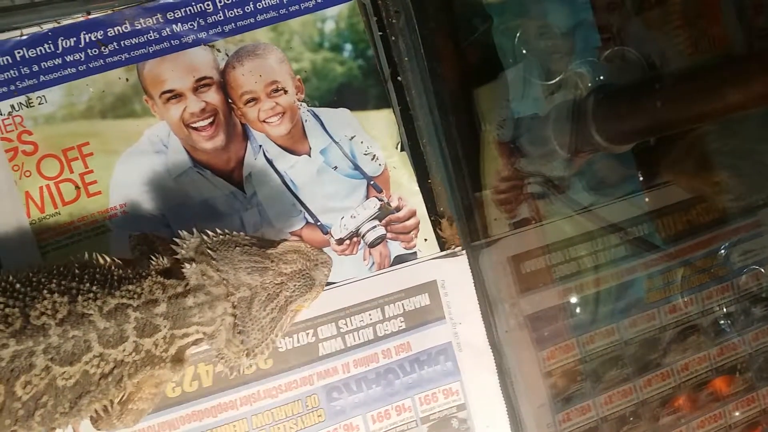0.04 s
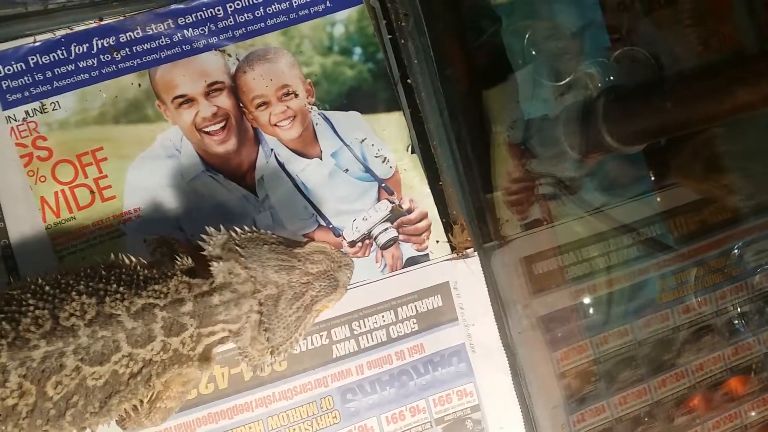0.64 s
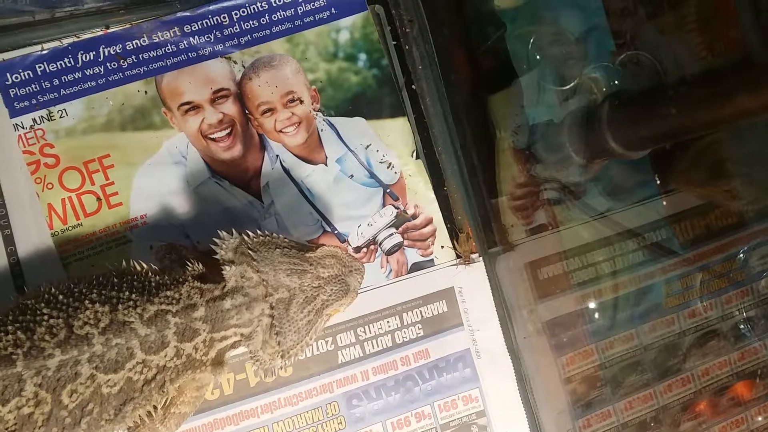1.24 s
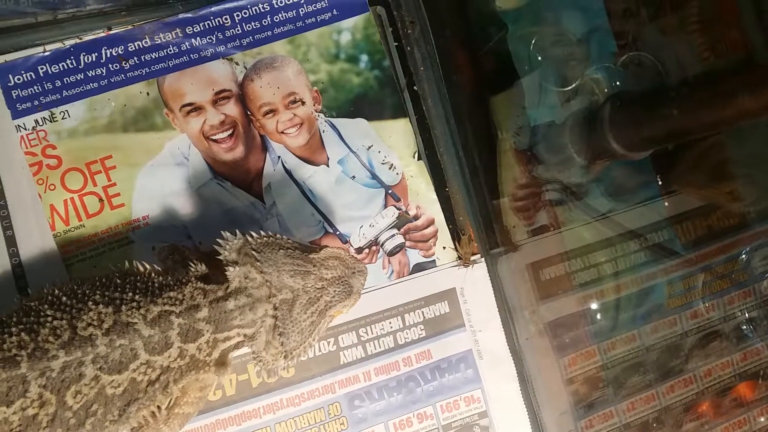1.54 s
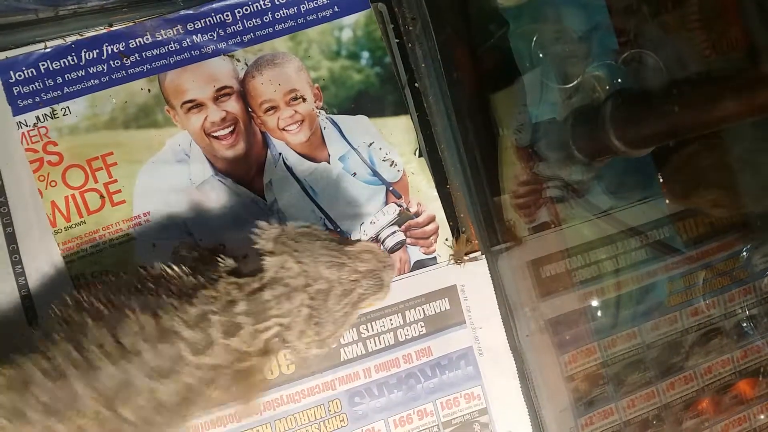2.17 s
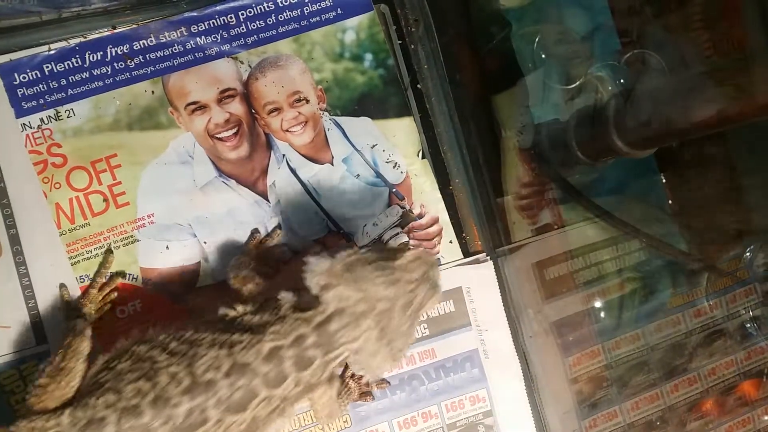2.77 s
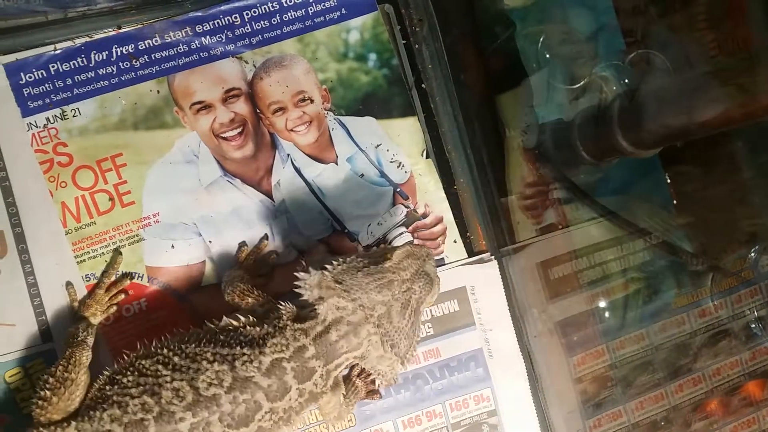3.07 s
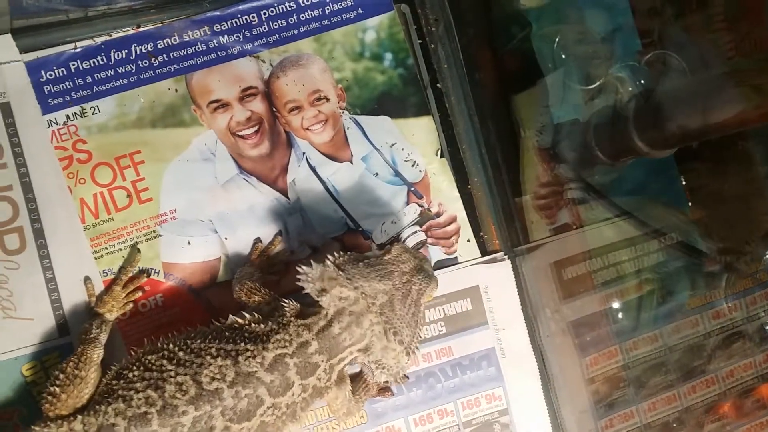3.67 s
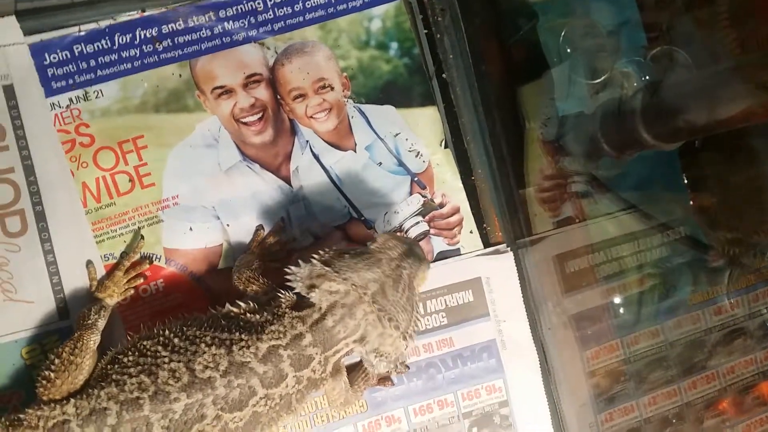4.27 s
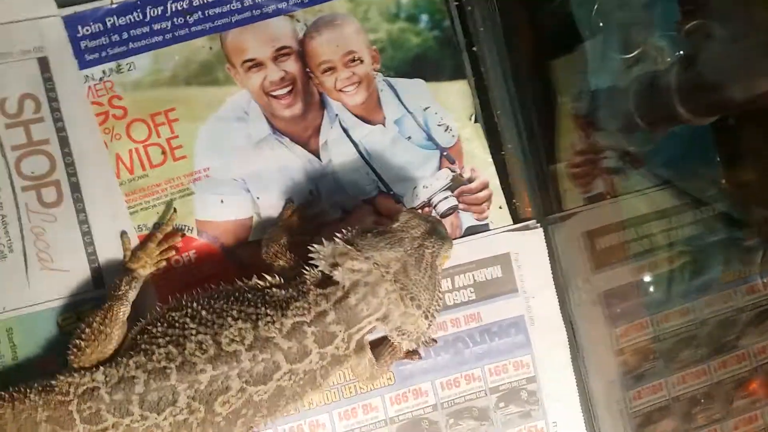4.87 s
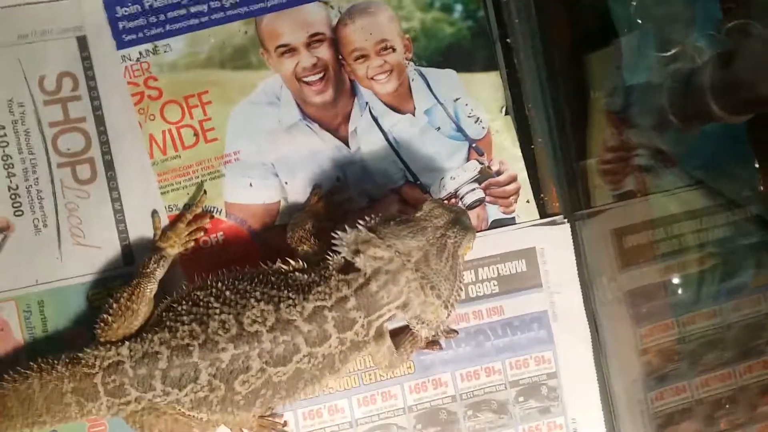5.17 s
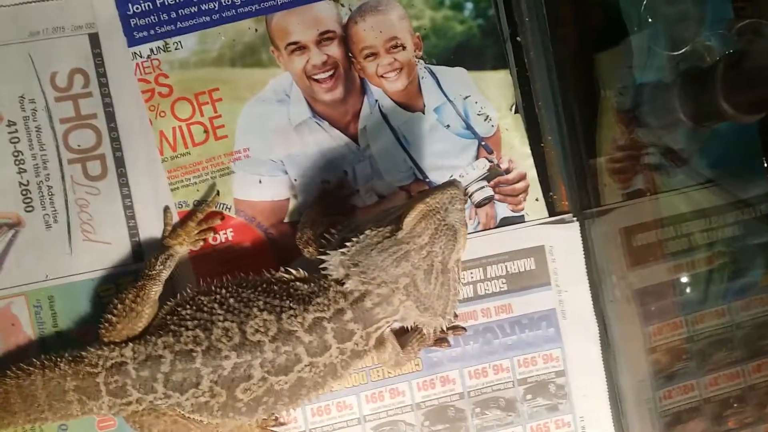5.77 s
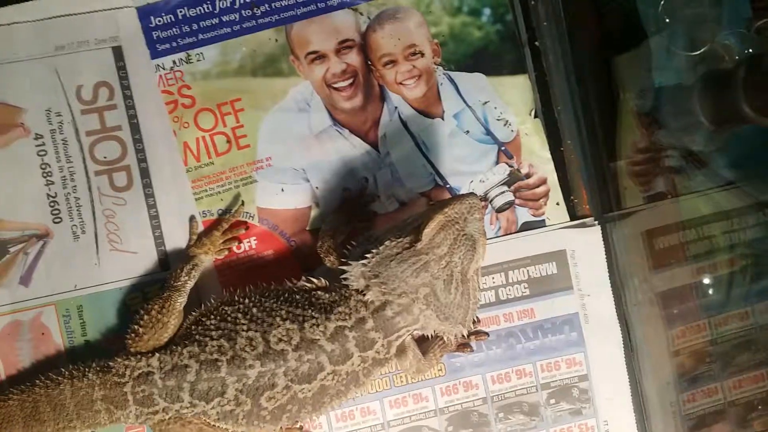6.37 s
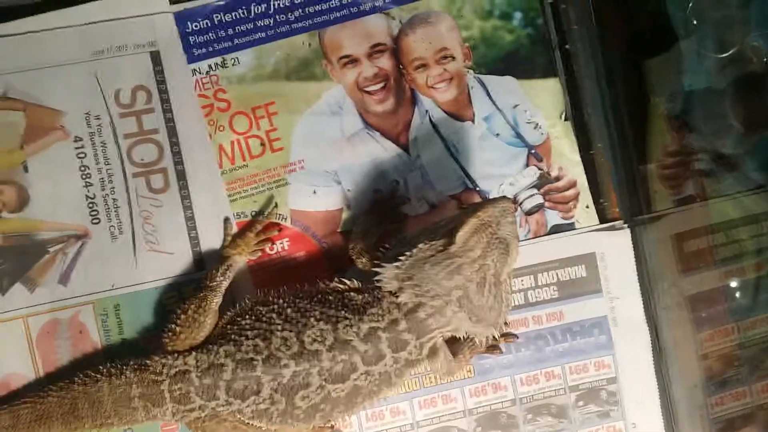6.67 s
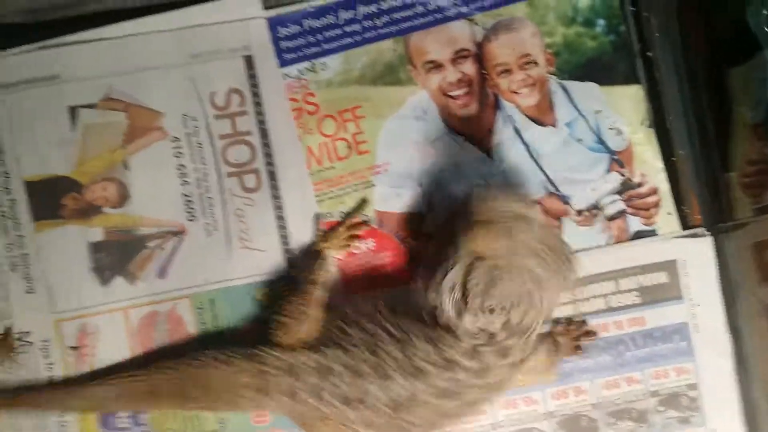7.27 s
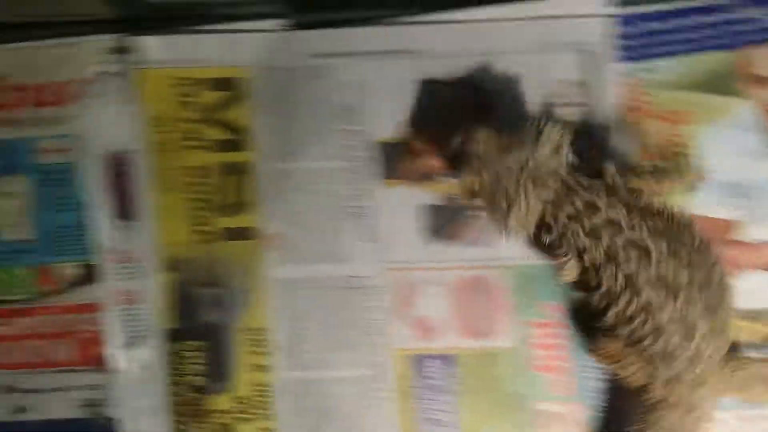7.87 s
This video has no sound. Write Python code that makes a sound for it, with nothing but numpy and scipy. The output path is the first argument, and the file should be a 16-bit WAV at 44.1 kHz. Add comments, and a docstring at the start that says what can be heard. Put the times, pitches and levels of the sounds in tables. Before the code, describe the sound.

A lizard stirs faintly on newspaper inside a glass tank, then lunges with a quick burst of rustling, claw scratches and soft thumps. It settles, leaving a few tiny paper ticks. Then it creeps forward with crinkling steps and breaks into a louder scramble. The microphones are close, with a faint electrical hum and hiss underneath.

```python
"""A glass tank lined with newspaper, a pair of microphones close to the lizard inside.
It stirs, lunges, settles, creeps and scrambles round. Its scales rasp on the sheets, its claws
tap and scratch, creases snap, and its weight drums the tank floor. The glass walls add short
echoes; a mains hum, quiet room noise and the microphones' faint hiss lie underneath."""
import sys
import numpy as np
from scipy import signal
from scipy.fft import rfft, irfft, next_fast_len
from scipy.io import wavfile
from scipy.ndimage import uniform_filter1d, map_coordinates

SR = 44100
rng = np.random.default_rng(int(sys.argv[2]) if len(sys.argv) > 2 else 0)


def file_out(sig):
    """Save sig as 16-bit WAV at sys.argv[1]."""
    # one column per channel
    cols = np.atleast_2d(sig).T
    # limit, then scale
    lim = np.clip(cols, -1, 1)
    pcm = np.round(lim * 32767).astype(np.int16)
    wavfile.write(sys.argv[1], SR, pcm)


N = 349713

# A limb or the belly pushed over the paper. Each row: start in seconds, length in seconds,
# relative level in dB, light over heavy contact in dB, swell from start to end in dB.
STROKES = [(0.548, 0.045, -73, 7, 0), (0.91, 0.046, -66.5, 1, -9), (1.166, 0.044, -60.5, 11, -2),
           (1.828, 0.082, -66.5, -4, 8), (2.102, 0.038, -56, 7.5, -8), (2.164, 0.13, -60, 11, 8),
           (2.268, 0.034, -40, 6.5, 14.5), (2.312, 0.058, -45, 8, -11), (2.382, 0.071, -38, -0.5, 1),
           (2.468, .058, -31.5, -2.5, 9.5), (2.531, 0.061, -42, -3, 4.5), (2.6, 0.29, -50.5, 2.5, 0.5),
           (2.667, 0.076, -45.5, 9, -11), (2.918, 0.58, -65, 9.5, -5), (3.806, 0.072, -74.5, 10, 17),
           (4.379, 0.2, -67.5, 1, -11), (5.028, 0.22, -65.5, -4, 2.5), (5.258, 0.35, -70, 0, -2),
           (5.569, 0.2, -59, -4, 2), (5.774, 0.18, -68, -7, 3), (5.925, 0.58, -60, -8, 0),
           (6.384, 0.14, -53.5, -2, 1.5), (6.532, 0.14, -49.5, -4, -4), (6.7, 0.15, -50, 1.5, -1),
           (6.847, 0.12, -44, -2.5, -18.5), (6.95, 0.26, -62.5, -8, 0), (7.153, 0.095, -51, 1, 1),
           (7.26, 0.087, -64, 2, 12), (7.331, 0.054, -47, 8, 11), (7.384, 0.067, -46, 17, 7.5),
           (7.456, 0.044, -34, 1, -8.5), (7.5, 0.098, -31.5, 16.5, -2.5), (7.613, 0.061, -30.5, 12, 4.5),
           (7.68, 0.11, -46.5, 1.5, 9.5), (7.772, 0.18, -38.5, 6, 7), (7.805, 0.018, -34.5, 8, 5)]


def amp(db):
    """Decibels to gain."""
    return 10 ** (np.asarray(db) / 20)


def unit(x):
    """Scale to rms 1."""
    return x / np.sqrt(np.mean(x ** 2) + 1e-20)


def along(points, hz):
    """Read between (Hz, value) points on a log frequency axis."""
    freqs, values = np.transpose(points)
    return np.interp(np.log(hz + 1), np.log(freqs + 1), values)


def wobble(rate, count=N):
    """A smooth random curve, rate knots a second."""
    return map_coordinates(rng.standard_normal(int(count * rate / SR) + 4), [np.arange(count) * rate / SR])


def burst(t, attack, t60):
    """A quick rise and an exponential fall of 60 dB in t60 seconds."""
    return (1 - np.exp(-t / attack)) * 10 ** (-3 * t / t60)


def noise():
    """White noise at each of the two microphones."""
    return rng.standard_normal((2, N))


def filtered(x, response):
    """Pass x through a frequency response."""
    count = x.shape[-1]
    size = next_fast_len(count + count // 10)
    return irfft(rfft(x, size) * response(np.fft.rfftfreq(size, 1 / SR)), size)[..., :count]


def ringing(modes, f):
    """Response of the direct sound plus resonances."""
    return 1 + sum(amp(db) * 1j * f * width / (hz * hz - f * f + 1j * f * width) for hz, width, db in modes)


def coloured(x, spectrum, modes=()):
    """Shape x with a broad spectrum and resonances, at rms 1."""
    return unit(filtered(x, lambda f: amp(along(spectrum, f)) * ringing(modes, f)))


def at_microphones(pair):
    """Long waves reach both microphones alike; each microphone's port has its own colour."""
    likeness = [(150, 0.91), (380, 0.77), (650, 0.44), (1000, 0), (16000, 0)]  # Each row: frequency in Hz, left-right correlation.
    balance = [(60, -2.5), (150, -2.5), (300, -2), (1100, -6.5), (2000, -1), (4200, -1), (6600, 4.5),
               (8400, -11), (10000, -4.5), (14000, -2)]  # Each row: frequency in Hz, left over right in dB.
    blend = lambda f: np.arcsin(np.clip(along(likeness, f), -1, 1)) / 2
    own = filtered(pair, lambda f: np.cos(blend(f)))
    crossed = filtered(pair[::-1], lambda f: np.sin(blend(f)))
    sides = lambda f: amp(np.outer([.5, -.5], along(balance, f)))
    return filtered(own + crossed, lambda f: sides(f) / np.sqrt(np.mean(sides(f) ** 2, axis=0)))


def microphone_hiss():
    """Each microphone's own noise."""
    # Each row: frequency in Hz, relative level in dB.
    left_colour = [(500, 3), (2200, -10.5), (4000, 3), (6500, 5), (8200, -3), (11000, -9.5), (16000, -3)]
    right_colour = [(500, 10), (2200, 0.5), (3600, -2), (6000, -4), (8400, -20), (10500, -15), (16000, 5)]
    left, right = noise()
    return np.array([amp(-68) * coloured(left, left_colour), amp(-73) * coloured(right, right_colour)])


def room_tone():
    """The mains and a small motor hum, wavering slightly, in quiet room noise."""
    # Each row: frequency in Hz, relative level in dB.
    hum_tones = [(59.2, -81.5), (118.6, -72), (121.2, -88), (242, -97.5)]
    room_colour = [(25, -34), (38, -23), (52, -12), (80, -3.5), (125, 4), (190, -6.5), (245, 2.5),
                   (320, -14.5), (440, -6), (700, -14.5), (1500, -16), (3000, -26.5), (8000, -41)]
    t = np.arange(N) / SR
    hum = np.zeros(N)
    for hz, db in hum_tones:
        level = np.sqrt(2) * amp(db + 4.1 * wobble(6.6))
        hum += level * np.sin(2 * np.pi * hz * t + 1.85 * wobble(1.8))
    return hum * amp([[-.8], [.8]]) + amp(-73.5) * at_microphones(coloured(noise(), room_colour))


def glass_echoes(x, t60, attack):
    """Dense echoes between the panes, different at each microphone."""
    t = np.arange(SR // 4) / SR
    tail = rng.standard_normal((2, len(t))) * burst(t, attack, t60)
    tail /= np.linalg.norm(tail, axis=1, keepdims=True)
    return signal.fftconvolve(x, tail, axes=1)[:, :N]


def footfalls():
    """Cushioned by paper, each landing gives a soft thud and sets the bottom pane ringing."""
    # Each row: start in seconds, relative level in dB, pitch in Hz, t60 in seconds.
    landings = [(0.575, -61, 272, 0.18), (2.494, -40, 122, 0.19), (2.555, -43, 112.2, 0.43),
                (3.089, -59, 251, 0.092), (4.287, -56.5, 105, 0.28), (4.469, -58, 111.8, 0.51),
                (6.126, -54, 133, 0.22), (6.488, -50.5, 228, 0.32), (6.599, -52.5, 235.3, 0.72),
                (6.795, -42, 139, 0.15), (6.862, -41.5, 110, 0.21), (7.157, -32, 150, 0.13),
                (7.687, -38, 110, 0.17), (7.913, -51, 130, 0.24)]
    # Each row: frequency in Hz, level against the thud in dB, t60 in seconds.
    pane_modes = [(95, -24, 0.63), (259, -11, 0.36), (420, -17.5, 0.44), (603, -21, 0.22)]
    t = np.arange(SR // 2) / SR
    ring = sum(amp(db) * np.sin(2 * np.pi * hz * t) * burst(t, attack=0.013, t60=t60)
               for hz, db, t60 in pane_modes)
    out = np.zeros(N + SR)
    for start, db, hz, t60 in landings:
        thud = np.sin(2 * np.pi * hz * t) * burst(t, attack=0.0055, t60=t60)
        out[round(start * SR):][:len(t)] += amp(db) * (thud + ring)
    return out[:N] * amp([[-1], [1]])  # a little to the right


def claw_scratches():
    """A dragged claw chatters on the fibres: a rough squeak whose pitch follows its speed."""
    # Each row: start and length in seconds, first and last pitch in Hz, relative level in dB.
    drags = [(2.428, .04, 2610, 1800, -46), (2.507, 0.019, 2940, 3200, -29.5),
             (2.553, 0.054, 3000, 3310, -42), (6.175, 0.013, 4740, 5450, -44),
             (6.71, .021, 2664, 7740, -44), (7.77, 0.044, 3100, 2530, -43.5),
             (7.808, 0.017, 2325, 2210, -36.5)]
    out = np.zeros((2, N + SR))
    for start, length, first_hz, last_hz, db in drags:
        hz = np.geomspace(first_hz, last_hz, round(length * SR))
        chatter = 1 + 0.056 * np.array([wobble(946, count=SR // 10) for _ in out])[:, :len(hz)]
        squeak = unit(np.sin(2 * np.pi * np.cumsum(hz * chatter, axis=1) / SR))
        out[:, round(start * SR):][:, :len(hz)] += amp(db) * np.hanning(len(hz)) * squeak
    return out[:, :N]


def paper_snap(crease_hz, fizz_db, knock_db, knock_hz, t60, left_db):
    """One snap: a crease gives way, its fibres fizz, and the hollow pile of sheets knocks."""
    # Each row: frequency in Hz, relative level in dB.
    crack_colour = [(700, -29), (1500, -2), (3200, 5), (5500, 2), (8000, -1), (14000, -55)]
    fizz_colour = [(3500, -25), (6000, 0), (8500, 4.5), (11000, -3), (13500, -3), (16000, -7)]
    knock_colour = [(120, -24), (300, -1), (520, 0), (800, 2.5), (1200, 1), (1600, -9), (3000, -20.5)]
    tick_colour = [(4000, -43), (7000, 18), (13500, 8), (16000, -6)]
    t = np.arange(SR // 5) / SR
    white = rng.standard_normal((4, 2, len(t)))
    # Short snaps start with a bright spike; longer ones are soft crushes that swell first.
    crisp = 0.034 / t60
    body = burst(t, attack=0.0012 / crisp ** 2, t60=t60)
    spike = crisp ** 2 * burst(t, attack=0.0003, t60=0.0045)
    crack = coloured(white[0], crack_colour, [(crease_hz, 450, 7)]) * (body + amp(-6.5) * spike) * amp(5)
    fizz = coloured(white[1], fizz_colour) * body * amp(-0.5)
    tick = coloured(white[2], tick_colour) * spike * amp(16.5)
    knock = coloured(white[3], knock_colour) * burst(t, attack=0.001, t60=0.058) * amp(1.5)
    hollow = np.sin(2 * np.pi * knock_hz * t) * burst(t, attack=0.00057, t60=0.058) * amp(-0.5)
    snap = crack + amp(fizz_db) * (fizz + tick) + amp(knock_db) * (knock + hollow)
    return amp([[left_db / 2], [-left_db / 2]]) * snap


def relaxing_creases(per_stroke=2, mean_delay_s=0.36, fizz_db=13):
    """Creases disturbed by a stroke tick back into place, the later the fainter."""
    for start, length, db, *_ in STROKES:
        for wait in rng.exponential(size=per_stroke):
            when = min(start + length / 2 + mean_delay_s * wait, N / SR)
            yield when, db - 31 - 3 * wait, fizz_db


def crackling_paper():
    """Claws strike the pile or press in with a soft crush, and small creases flick over."""
    # Each row: start in seconds, relative level in dB, fizz and knock gains in dB, knock pitch in Hz.
    claw_taps = [(0.932, -64, -1, -2, 830), (1.89, -60.5, -17, -6, 910), (2.307, -42, 0, -29, 1250),
                 (2.377, -37.5, -13, -4, 1050), (2.402, -33.5, 2.5, -22, 1250), (2.412, -36, -3, -25, 1260),
                 (2.546, -35, 3, 0.5, 1040), (2.621, -45, -19, -3, 1275), (2.677, -37.5, -0.5, -9, 602),
                 (3.088, -42, 0, -4, 500), (3.3149, -50, 6.5, -6, 713), (3.463, -64.5, -2, -0.5, 1240),
                 (3.556, -63, 0, 3, 785), (4.111, -61.5, -1.5, 9.5, 872), (3.886, -67, -1, 1, 474),
                 (4.289, -73, -8, 6, 434), (5.686, -53, -24, -8, 1270), (7.156, -26.5, 4.5, -14, 1240),
                 (7.462, -31.5, 3, -10.5, 1212), (7.468, -36, -2, -3, 1295), (7.661, -41, 8, 1.5, 466),
                 (7.925, -32.5, -3, 1.5, 1250)]
    # Each row: start in seconds, relative level in dB, fizz gain in dB.
    claw_grips = [(5.289, -60.5, -12), (5.754, -52.5, -4.5), (6.124, -44.5, -2.5), (6.178, -45, -16),
                  (6.212, -49, -2), (6.315, -48, -25), (6.368, -43, -8), (6.438, -50, -4),
                  (6.549, -43.5, 10), (6.604, -42, -13), (6.705, -40.5, -2), (6.715, -36, 1.5),
                  (6.799, -47, -16), (6.825, -38.5, .5), (6.862, -42, 2), (7.085, -55.5, 0.5),
                  (7.872, -36, 0)]
    crease_flicks = [(0.604, -66.5, 9), (0.914, -73, 13.5), (1.374, -61.5, 3.5), (1.596, -59.5, 4),
                     (2.632, -54, 20), (2.781, -63, 22), (2.805, -59, 23), (3.254, -72, 15),
                     (3.3013, -60, 15.5), (3.361, -62, 5), (5.167, -51.5, 12.5), (7.225, -49, 4),
                     (7.584, -41.5, 11), (7.6242, -42.5, 18)]
    out = np.zeros((2, N + SR))
    vary = lambda hz: hz * np.exp(0.14 * rng.standard_normal())

    def add(start, db, snap):
        out[:, round(start * SR):][:, :snap.shape[1]] += amp(db) * snap

    for start, db, fizz_db, knock_db, knock_hz in claw_taps:
        crease_hz = 3530 * 2 ** (fizz_db / 29)  # a sharper tap folds a smaller, higher crease
        t60 = 0.055 * 2 ** (db / 79)  # a weaker tap bends less paper and dies sooner
        add(start, db, paper_snap(crease_hz, fizz_db, knock_db, knock_hz, t60, left_db=0.8))
    for start, db, fizz_db in claw_grips:
        crush = paper_snap(vary(4870), fizz_db, knock_db=-12, knock_hz=vary(1150), t60=0.049, left_db=3)
        add(start, db, crush)
    for start, db, fizz_db in [*crease_flicks, *relaxing_creases()]:
        flick = paper_snap(vary(5550), fizz_db, knock_db=-16, knock_hz=vary(520), t60=0.04, left_db=0)
        add(start, db, flick)
    return out[:, :N]


def contact_power():
    """Power of heavy and of light contact: each stroke rises, swells or sags, and lets go."""
    t = np.arange(SR) / SR
    split = lambda light_db: np.array([[1], [amp(light_db) ** 2]]) / (1 + amp(light_db) ** 2)
    faint_rubbing = amp(-75 + 4.25 * wobble(7.2, count=N + SR))
    power = split(light_db=6) * faint_rubbing ** 2
    for start, length, db, light_db, swell_db in STROKES:
        attack_s, release_t60 = 0.0072 + 0.1 * length, 0.075 + 0.79 * length  # slow strokes ease in and out
        rise = np.minimum(t / attack_s, 1)
        hold = amp(db + swell_db * (np.minimum(t / length, 1) - .5))
        release = 10 ** (-3 * np.maximum(t - length, 0) / release_t60)
        power[:, round(start * SR):][:, :len(t)] += split(light_db) * (rise * hold * release) ** 2
    return power[:, :N]


def floor_rumble(heavy, light, lag_s=0.011, ceiling_db=-45.5):
    """The floor follows the contact with a lag, up to the most the body's weight can raise."""
    floor_colour = [(35, -36), (55, 0), (85, -3), (140, 6), (200, -2), (320, -6.5), (560, -2), (750, -8.5),
                    (1300, -18)]  # Each row: frequency in Hz, relative level in dB.
    drive = np.hypot(heavy, amp(-7) * light)  # skimming shakes it less than pressing
    pole = np.exp(-1 / (lag_s * SR))
    shake = signal.lfilter([1 - pole], [1, -pole], drive)
    return shake / (1 + shake / amp(ceiling_db)) * coloured(noise(), floor_colour)


def flexing(x, patchy_db):
    """The sheet bends under the animal, so its resonances come and go."""
    spectra = signal.stft(x, nperseg=512)[2]
    bend = rng.standard_normal(spectra.shape)
    bend = bend + bend[::-1] * .5  # both microphones hear much the same bending
    bend = uniform_filter1d(bend, size=4, axis=1)  # smooth over frequency
    bend = uniform_filter1d(bend, size=10, axis=2)  # and over time
    return unit(signal.istft(spectra * amp(patchy_db * unit(bend)), nperseg=512)[1][:, :N])


def fibre_catches(per_second, life_s, spread_db=4):
    """Scales catch on paper fibres: tiny bursts of uneven size over a smooth rub."""
    sizes = (rng.random(N) < per_second / SR) * amp(spread_db * np.minimum(rng.exponential(size=N), 4))
    t = np.arange(SR // 50) / SR
    power = np.abs(signal.fftconvolve(sizes ** 2, np.exp(-t / life_s))[:N])
    return noise() * np.sqrt(power / power.mean() + 1)


def scale_rasp(heavy, light):
    """Heavy contact rasps the whole sheet; scale tips skimming light and fast hiss."""
    # Each row: frequency in Hz, relative level in dB.
    pressed_colour = [(300, -31), (600, -10), (1100, -2.5), (1600, -1), (3100, -4), (4000, -4),
                      (6000, -7.5), (12000, -33)]
    skimmed_colour = [(1800, -22), (3200, -2), (4300, -3.5), (6500, 0), (8500, 1), (10500, -4.5),
                      (14500, -5), (16500, -8)]
    # Each row: resonance in Hz, width in Hz, level against the direct sound in dB.
    sheet_modes = [(973, 33, 2.5), (1372, 14, 3), (1550, 10, -20), (2460, 20, -15.5), (2570, 63, -11),
                   (3250, 53, -17)]
    grit = fibre_catches(per_second=300, life_s=0.0013)
    pressed = flexing(coloured(grit, pressed_colour, sheet_modes), patchy_db=3.5)
    fine_grit = fibre_catches(per_second=800, life_s=0.00069)
    skimmed = flexing(coloured(fine_grit, skimmed_colour), patchy_db=1.5)
    jerks = amp(1.3 * wobble(110) + 1.73 * wobble(28))  # a stroke advances unevenly
    return amp(-1) * (heavy * pressed + light * skimmed) * jerks


def scene():
    """The lizard close up in its ringing tank, over room tone and hiss."""
    # Each row: resonance in Hz, width in Hz, level against the direct sound in dB.
    tank_modes = [(110, 29, -11), (243.4, 16, 3), (257, 10.7, 7), (417.2, 7.2, 2), (565.7, 2.5, -26)]
    heavy, light = np.sqrt(contact_power())
    lizard = scale_rasp(heavy, light) + floor_rumble(heavy, light) + crackling_paper() + claw_scratches()
    resonant = filtered(lizard, lambda f: ringing(tank_modes, f))
    tank = resonant + amp(-12) * glass_echoes(resonant, t60=0.094, attack=0.0029)
    return at_microphones(tank) + footfalls() + room_tone() + microphone_hiss()


def record(dry):
    """The camera keeps nothing above its band limit."""
    return filtered(dry, lambda hz: hz < 15750)


dry = scene()
out = record(dry)
file_out(out)
```